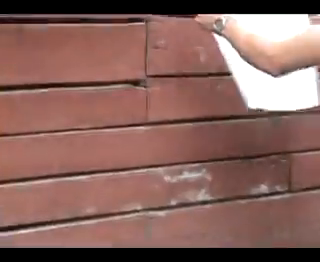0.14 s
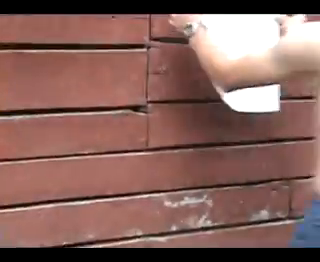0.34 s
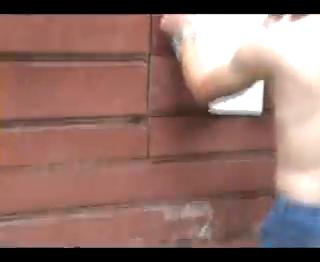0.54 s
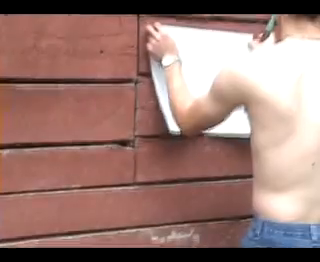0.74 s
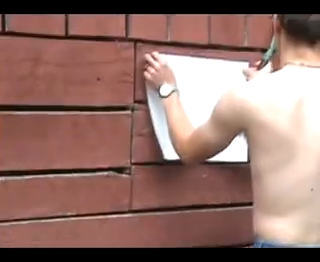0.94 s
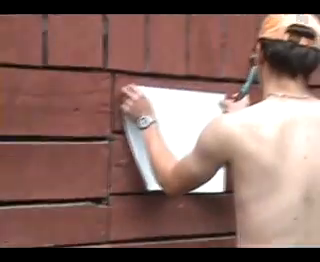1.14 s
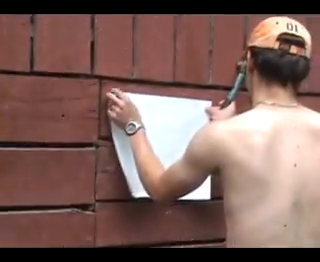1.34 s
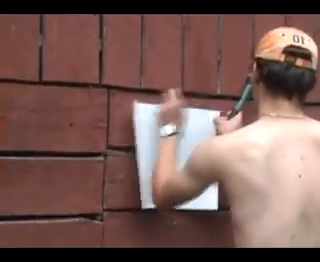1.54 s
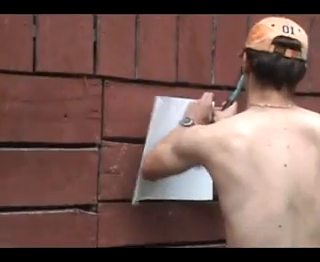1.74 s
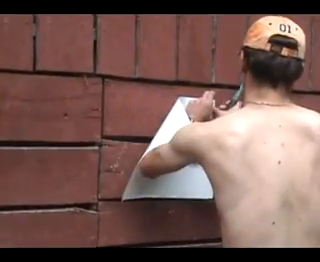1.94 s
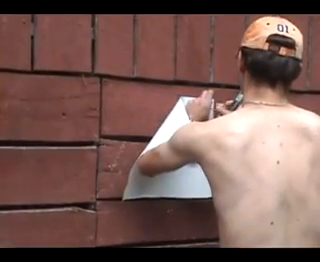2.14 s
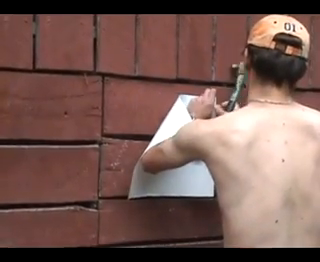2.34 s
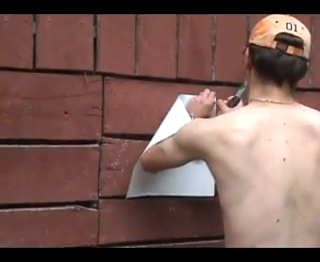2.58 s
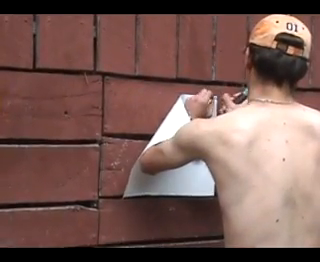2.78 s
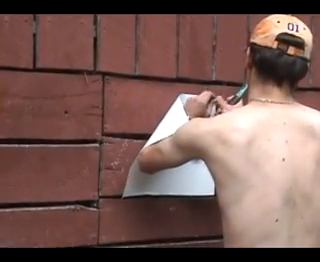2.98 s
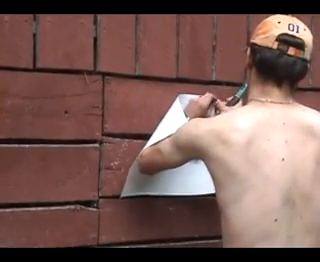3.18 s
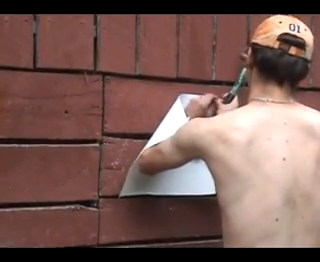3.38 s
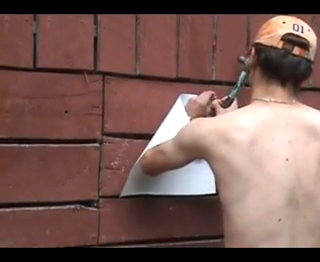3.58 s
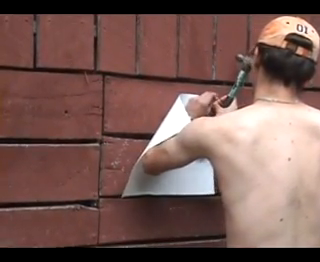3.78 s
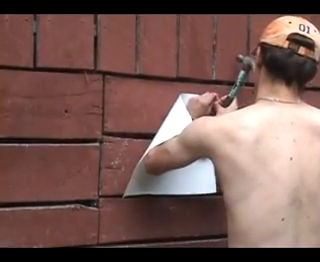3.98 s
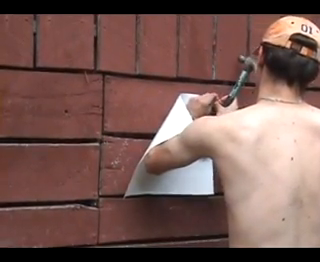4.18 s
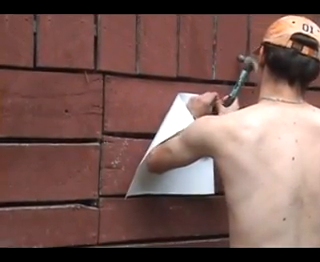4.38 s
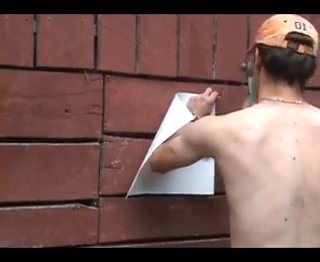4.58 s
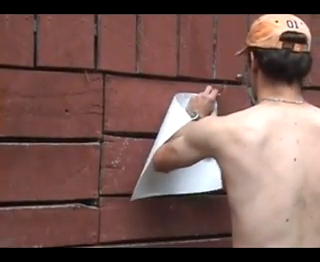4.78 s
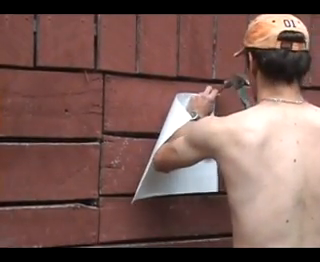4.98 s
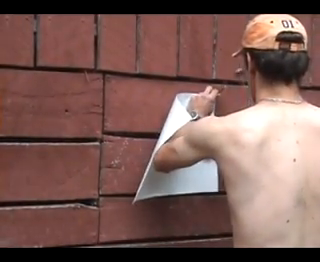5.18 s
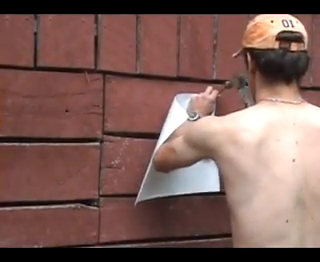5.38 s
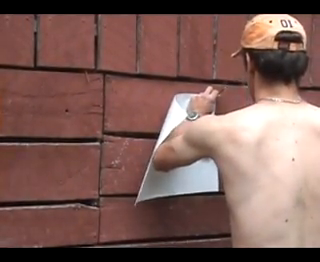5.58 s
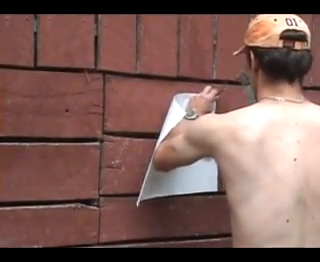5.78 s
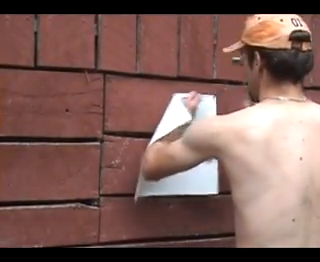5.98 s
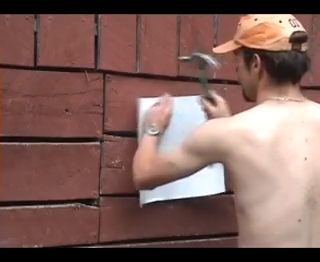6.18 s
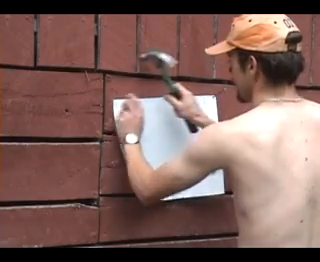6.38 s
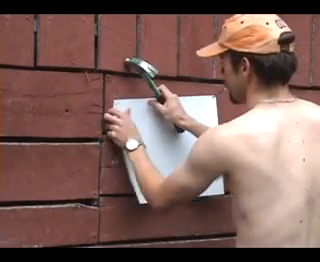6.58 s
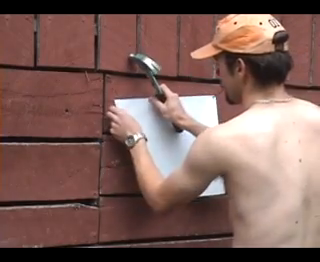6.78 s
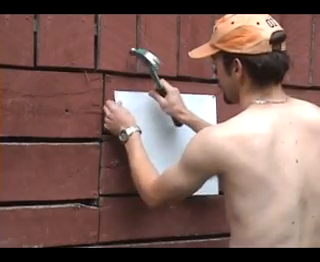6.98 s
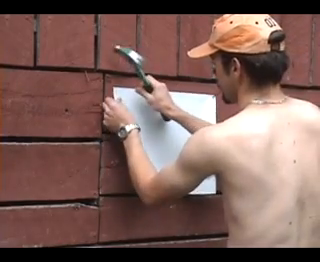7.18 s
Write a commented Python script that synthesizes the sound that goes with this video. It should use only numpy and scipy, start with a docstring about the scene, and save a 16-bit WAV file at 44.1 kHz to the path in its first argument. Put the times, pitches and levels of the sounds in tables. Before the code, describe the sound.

Close handling clicks and rubbing give way to quiet paper scrapes, soft wooden thuds, then sharp hammer blows on hollow boards over faint hiss.

```python
"""At a plank barn wall, a sheet of paper is nailed up near a hand-held tape camera.
First fingers creak, rub and bump on the camera shell: decaying modes and shaped friction noise.
Then hands and hammer thud on the hollow wall (plank modes over dense ringing), and the paper slides
and ticks as noise in strokes and bursts. The camera motor whines as wavering sines under hiss,
and a limiter holds down the loud peaks."""
import sys
import numpy as np
from scipy import signal
from scipy.fft import rfft, irfft, next_fast_len
from scipy.io import wavfile
from scipy.ndimage import uniform_filter1d, minimum_filter1d, map_coordinates

SR = 44100
rng = np.random.default_rng(int(sys.argv[2]) if len(sys.argv) > 2 else 0)


def to_wav(s):
    """Save 16-bit WAV."""
    ch = np.atleast_2d(s).T  # columns
    pcm = np.round(np.clip(ch, -1, 1) * 32767)  # PCM
    wavfile.write(sys.argv[1], SR, pcm.astype(np.int16))


N = 318843

# signs of the left and right channels
SIDES = np.array([[1], [-1]])
# correlation of left and right for hiss and loose rattles: freq_hz, likeness (-1 to 1)
HISS_ALIKE = [(60, 0.45), (130, -0.48), (290, -0.16), (640, 0.3), (1410, 0.19), (3100, 0.66), (6820, 0.41),
              (15000, -0.51)]
# correlation of left and right for friction, ticks and boards: freq_hz, likeness (-1 to 1)
NEAR_ALIKE = [(60, 1), (130, 1.0), (290, 0.99), (640, 0.89), (1410, 0.86), (3100, 0.92), (6820, 1),
              (15000, 0.54)]
# relative spectrum of the bright part of friction: freq_hz, density_db (per Hz)
FIZZ = [(1290, -21), (2200, -7), (2940, -5), (3730, -9), (4360, -7), (8510, -12.5), (11600, -9.5),
        (12600, -35), (13000, -85)]


def amp(db):
    """Decibels are logarithmic: 20 dB is a tenfold gain in amplitude."""
    return 10 ** (np.asarray(db) / 20)


def unit(x):
    """Normalisation by effective value: the signal is scaled to rms 1."""
    return x / np.sqrt(np.mean(x ** 2) + 1e-20)


def along(points, hz):
    """Interpolation of (frequency, value) points along a logarithmic frequency axis."""
    f, v = np.transpose(points)
    return np.interp(np.log(hz + 1), np.log(f + 1), v)


def tilt(hz, db_per_octave, pivot_hz):
    """Spectral slope: a constant number of decibels per octave about a pivot."""
    return amp(db_per_octave * np.log2(np.maximum(hz, 20) / pivot_hz))


def soft(hz, hardness_hz):
    """Contact time: a softer contact lasts longer and drives less treble."""
    return 1 / (1 + (hz / hardness_hz) ** 2)


def wobble(rate):
    """Slow random modulation: a smooth curve through random knots, rate of them a second."""
    knots = rng.standard_normal(int(N * rate / SR) + 4)
    return map_coordinates(knots, [np.arange(N) * rate / SR])


def filtered(x, response):
    """Linear filtering: the spectrum of x is multiplied by a response of frequency."""
    m = next_fast_len(x.shape[-1] + 8192)
    return irfft(rfft(x, m) * response(np.fft.rfftfreq(m, 1 / SR)), m)[..., :x.shape[-1]]


def stereo(pair, spectrum, alike):
    """Interchannel correlation: two unrelated signals, coloured, mix as mid and side to a set likeness."""
    # difference of the two microphones: freq_hz, left_minus_right_db
    lean = [(300, 0), (700, -1), (1290, -2.5), (2380, -3), (4400, -4.5), (8120, -0.5), (15000, -9)]

    def mid_side(hz):
        turn = np.arccos(np.clip(along(alike, hz), -1, 1)) / 2
        return amp(along(spectrum, hz)) * [np.cos(turn), np.sin(turn)]

    mid, side = filtered(pair, mid_side)
    left_right = np.array([mid + side, mid - side])
    return filtered(left_right, lambda hz: amp(SIDES * along(lean, hz) / 2))


def rustle(spectrum, grain_db, surge_db):
    """Friction as modulated noise: fine grains in time, and surges in patches of the spectrum."""
    grains = amp(grain_db * wobble(500)) * rng.standard_normal((2, N))
    z = signal.stft(grains, nperseg=256)[2]
    patches = uniform_filter1d(rng.standard_normal(z.shape[1:]), size=14, axis=0)
    patches = uniform_filter1d(patches, size=5, axis=1)
    pair = signal.istft(z * amp(surge_db * unit(patches)), nperseg=256)[1][:, :N]
    return unit(stereo(pair, spectrum, NEAR_ALIKE))


def strokes(rows, rise_db_per_s, fall_db_per_s, rest_db):
    """Stroke envelopes, summed in power: each rises, holds its length and falls to a faint rest level."""
    start, length, *levels = np.transpose(rows)[:, :, None]
    t = np.arange(0, N / SR + .002, .001)
    before, after = np.maximum(start - t, 0), np.maximum(t - start - length, 0)
    loss = rise_db_per_s * before + fall_db_per_s * after
    gains = []
    for db, rest in zip(levels, rest_db):
        power = np.sum(amp(db - loss) ** 2, axis=0) + amp(rest) ** 2
        gains.append(np.interp(np.arange(N) / SR, t, np.sqrt(power)))
    return gains


def add(track, s, sound):
    """Superposition: a short sound is added to the track at s seconds."""
    part = track[:, round(s * SR):][:, :sound.shape[1]]
    part += sound[:, :part.shape[1]]


def camera():
    """Periodic and random machine noise: motor lines that waver a little in phase and level, over hiss."""
    # motor lines: freq_hz, level_db
    motor_lines = [(91.5, -63.5), (473.7, -66), (802.1, -58.5), (1147, -66.5), (1459, -67.5), (2099, -75),
                   (2611, -74), (2945, -77), (4194, -77)]
    # relative hiss spectrum: freq_hz, density_db (per Hz)
    hiss_spectrum = [(15, -34), (25, -6), (50, -4.5), (110, -2), (200, -1), (340, -3), (600, -1.5),
                     (1100, -9.5), (1700, -12), (2500, -12.5), (3500, -16), (5600, -16), (8000, -27),
                     (11000, -32), (13000, -75)]
    hiss_db = -58.5
    t, whine = np.arange(N) / SR, 0
    for hz, db in motor_lines:
        waver = min(hz / 900, 1) * wobble(14)
        side_phase = SIDES * min(hz / 700, 1.2)
        level = amp(db + 2.4 * wobble(8.6))
        whine = whine + level * np.sin(2 * np.pi * hz * t + waver + side_phase)
    hiss = unit(stereo(rng.standard_normal((2, N)), hiss_spectrum, HISS_ALIKE))
    return whine + amp(hiss_db + 0.2 * wobble(3.7)) * hiss


def grip():
    """Sliding friction and rocking: the palm rubs the shell and rocks the camera until the grip settles."""
    # strokes of the palm: start_s, length_s, rub_db, fizz_db
    palm_strokes = [(0.0, 0.098, -50, -75), (0.03, 0.012, -58, -60), (0.09, 0.014, -43.5, -74),
                    (0.21, 0.023, -50, -70), (0.365, 0.064, -44.5, -59), (0.44, 0.03, -56, -65),
                    (0.53, 0.014, -55, -58), (0.605, 0.075, -53, -53), (0.705, 0.017, -48, -63),
                    (0.803, 0.018, -53, -53.5), (0.93, 0.026, -62, -72), (1.02, 0.032, -53, -57.5),
                    (1.08, 0.028, -56, -56), (1.235, 0.0089, -56, -53), (1.37, 0.065, -58, -56),
                    (1.44, 0.07, -52, -61), (1.55, 0.057, -54, -72), (1.71, 0.061, -55, -62),
                    (1.77, 0.024, -44.5, -57), (1.89, 0.019, -60, -58.5), (1.99, 0.02, -51.5, -58),
                    (2.075, 0.023, -52, -60)]
    # relative spectrum of the rub: freq_hz, density_db (per Hz)
    rub_spectrum = [(88, -12), (150, 12), (945, 19), (1240, 13), (1510, 17.5), (3350, 6), (4000, -1),
                    (5200, -57), (8800, -120)]
    # rocking of the camera: start_s, level_db
    bumps = [(0.22, -45.5), (0.6, -45), (0.82, -43), (1.03, -41), (1.42, -39.5), (1.78, -64)]
    # relative spectrum of the rocking: freq_hz, density_db (per Hz)
    bump_spectrum = [(15, -8), (30, -21), (55, -1), (90, -47), (150, -49)]
    still_s = 2.15
    rub, fizz = strokes(palm_strokes, rise_db_per_s=704, fall_db_per_s=348, rest_db=(-64, -72))
    bump_rows = [(s, 0, db) for s, db in bumps]
    rock, = strokes(bump_rows, rise_db_per_s=450, fall_db_per_s=400, rest_db=[-79])
    rocking = rock * unit(stereo(rng.standard_normal((2, N)), bump_spectrum, [(30, 0.4)]))
    rubbing = rub * rustle(rub_spectrum, grain_db=3.0, surge_db=4.0)
    fizzing = fizz * rustle(FIZZ, grain_db=3.0, surge_db=-1.0)
    moving = np.clip((still_s - np.arange(N) / SR) * 20, 0, 1)  # fades over the last 50 ms
    return moving * (rubbing + fizzing + rocking)


def creaks():
    """Stick-slip and modal ringing: each slip of a finger rings the shell, unequally at two microphones."""
    # slips: start_s, level_db, brightness_db_per_octave, depth_db (modes under 650 Hz), left_minus_right_db
    slips = [(0.104, -12, -6.5, 1, -0.5), (0.158, -17.5, -9, 7.5, 1), (0.194, -32, -20, 15, 5),
             (0.205, -23.5, -18, 10, 2), (0.228, -36.5, -6, 12, 0), (0.352, -33, -9, 25, 2),
             (0.388, -23, -5, -11, -5), (0.396, -13.5, -4.5, -2, 0), (0.444, -29, -0.5, -9, 1.5),
             (0.524, -11, -2.5, -1, 0.5), (0.573, -19.5, -26, -2, 7), (0.585, -22.5, -14, 5, -3),
             (0.649, -29, -5, -4, -3), (0.719, -16, -5.5, 0, -0.5), (0.753, -19.5, -7, 4, 0.5),
             (0.778, -24, -10, -2, 1), (0.792, -24.5, -19, 7, 4), (0.803, -22, -12, 5.5, -2),
             (0.973, -17, -8.5, -1.5, 1.5), (1.024, -25.5, -30, 3, 3.5), (1.068, -34, -14, 13, 1),
             (1.093, -28.5, -35, 4, 6), (1.131, -27, -31, 12, 0), (1.201, -22.5, -8.5, 4, 2.5),
             (1.303, -23.5, -7, -1.5, 1), (1.372, -23.5, -11, 3, 2), (1.402, -41, -10, 9, 8),
             (1.418, -13.5, 2, 10.5, 0.5), (1.461, -39, -5, 11, -4), (1.489, -38, 4, 13, 2),
             (1.57, -22.5, -5, 3, -3.5), (1.584, -26, -4.5, 6, 7), (1.602, -28, -4.5, 6, -10),
             (1.624, -33.5, 1, 11, 0), (1.645, -37, -21, 7, -1), (1.689, -41, -13, 20, 2),
             (1.723, -28.5, -4, 2, -6.5), (1.735, -33, 3, -6, 2), (1.746, -38, 3, -8, 2),
             (1.759, -22.5, 2.5, -3, 2.5), (1.915, -38, 0.5, 6, 4), (1.989, -38.5, 7, 6, -3),
             (2.081, -45.5, -2, 7, -7)]
    # shell modes: freq_hz, level_db, t60_s, left_minus_right_db, left_lead_rad (used within 3 either way)
    shell = [(357, -13.5, 0.038, 9, 1), (544, -2, 0.022, -5, 1.27), (785, 2, 0.034, -1, 1.67),
             (1070, -2, 0.05, -12, -3), (1340, -31.5, 0.06, -43, -5), (1694, -1, 0.025, -6, 0.7),
             (2150, -12, 0.028, -1, 0.5), (2695, -4, 0.028, -4, 0.46), (3194, -10, 0.025, 9, 0),
             (3930, -7.5, 0.025, -13.5, -13.5), (4485, -16.5, 0.033, 1, 0.3), (5300, -12.5, 0.024, -5, -8),
             (7430, -32, 0.013, -5, -0.8)]
    # relative spectrum of loose parts: freq_hz, density_db (per Hz)
    rattle_spectrum = [(150, -13.5), (400, 9.5), (900, 4), (1400, -6.5), (2500, -18), (4000, -24),
                       (8000, -66)]
    out, t = np.zeros((2, N)), np.arange(SR // 8) / SR
    hz, level, t60, lean, lead = np.transpose(shell)[:, :, None, None]
    dying = amp(-60 * t / t60) + amp(6.5 - 60 * t / (0.41 * t60))  # the first swings are the largest
    for s, db, bright_db, depth_db, pan_db in slips:
        share = amp(level + depth_db * (hz < 650) + rng.normal(0, 2, hz.shape))
        share = share * tilt(np.maximum(hz, 1200), bright_db, 1200)
        pitch = hz * (1 + rng.normal(0, 0.026, hz.shape))
        turn = 2 * np.pi * pitch * t + np.clip(lead, -3, 3) * (SIDES > 0)
        ring = np.sum(share * dying * amp(SIDES * lean / 2) * np.sin(turn), axis=0) / share.sum()
        ring = ring * (1 - np.exp(-t / .0004)) ** 2
        # loose parts rattle on, duller and later
        shaking = (1 - np.exp(-t / 0.00061)) ** 2 * amp(-60 * t / 0.092)
        rattle = stereo(rng.standard_normal((2, len(t))) * shaking, rattle_spectrum, HISS_ALIKE)
        # hard slips spit treble
        snap_gain = (1 - np.exp(-t / 0.0013)) * amp(-17.5 + 2.5 * bright_db - 60 * t / 0.018)
        snap = snap_gain * rng.standard_normal(len(t))
        click = ring + amp(-7) * rattle + snap
        add(out, s + 0.0015, amp(db + 5.5 + SIDES * pan_db / 2) * click)
    return out


def paper():
    """Friction and impulses: the sheet slides on rough paint; single creases and the nail tick."""
    # strokes of the sheet over the paint: start_s, length_s, slide_db, fizz_db
    swipes = [(2.24, 0.053, -62, -76), (2.61, 0.064, -64, -62.5), (2.7, 0.023, -56, -70),
              (2.935, 0.012, -59, -66), (3.0, 0.035, -52.5, -61), (3.1, 0.026, -59, -62),
              (3.175, 0.11, -55, -70), (3.32, 0.072, -61.5, -62), (3.47, 0.055, -56.5, -59.5),
              (3.62, 0.027, -54.5, -64), (3.74, 0.026, -60, -66), (4.21, 0.02, -75, -78),
              (4.43, 0.014, -60, -57.5), (4.498, 0.0064, -51, -74), (4.755, 0.029, -43, -47),
              (4.8, 0.022, -53.5, -58), (4.92, 0.0092, -56.5, -60), (5.19, 0.02, -61, -82),
              (5.5, 0.15, -50, -64.5), (5.86, 0.061, -39, -44.5), (5.97, 0.12, -45.5, -53.5),
              (6.12, 0.12, -48, -46), (6.26, 0.086, -51.5, -50), (6.38, 0.16, -58.5, -56),
              (6.63, 0.014, -54, -60), (6.76, 0.036, -49.5, -47.5), (6.875, 0.022, -55.5, -55.5),
              (7.04, 0.17, -62.5, -59.5)]
    # relative spectrum of the slide: freq_hz, density_db (per Hz)
    slide_spectrum = [(120, -80), (200, -39), (310, -0.5), (419, -15.5), (946, -8), (1030, -10.5),
                      (4000, -25), (5200, -69), (8800, -120)]
    # ticks of paper and nail: start_s, level_db, brightness_db_per_octave
    ticks = [(2.399, -42.5, -2.5), (2.698, -45, -2), (3.089, -24.5, -4.5), (3.19, -40, -11),
             (3.21, -37.5, -2), (3.262, -40, -12), (3.328, -46, 2.5), (3.519, -43.5, -5), (3.622, -38, 1),
             (3.632, -34.5, -2.5), (3.745, -38, -2.5), (3.768, -46, -7), (4.158, -53.5, 6),
             (4.198, -45.5, 0), (4.294, -47, -14), (4.434, -49, 1), (4.494, -39.5, -9), (4.707, -40, -10.5),
             (4.764, -26, -4), (4.829, -40.5, -0.5), (4.918, -48, -6), (5.864, -45, -5), (6.208, -33.5, -6),
             (6.758, -39.5, 2), (6.874, -44, 2), (7.031, -45, -5)]
    # tick spectrum before its brightness slope: freq_hz, density_db (per Hz)
    tick_spectrum = [(200, -29.5), (500, -4), (1000, 4.5), (2500, 6.5), (6000, -9), (12000, -23)]
    tick_t60_s = 0.049
    slide, fizz = strokes(swipes, rise_db_per_s=706, fall_db_per_s=309, rest_db=(-66.5, -70.5))
    out = slide * rustle(slide_spectrum, grain_db=1.0, surge_db=1.5)
    out = out + fizz * rustle(FIZZ, grain_db=1.0, surge_db=3.0)
    t = np.arange(SR // 8) / SR
    tick_shape = (1 - np.exp(-t / 0.00086)) * amp(-60 * t / tick_t60_s)
    for s, db, bright_db in ticks:
        burst = rng.standard_normal((2, len(t))) * tick_shape
        colour = [(hz, level + bright_db * np.log2(hz / 1500)) for hz, level in tick_spectrum]
        add(out, s, amp(db) * stereo(burst, colour, NEAR_ALIKE))
    return out


def hammer_snap(t):
    """Hard impact: steel on steel gives a sharp snap, the ring of the head and a short bright spray."""
    head_hz, head_db, head_t60_s = 2830, -14.5, 0.047
    snap = np.sin(2 * np.pi * 4000 * t) * amp(-60 * t / 0.002)
    ring = np.sin(2 * np.pi * head_hz * t) * amp(head_db - 60 * t / head_t60_s)
    spray = 0.2 * rng.standard_normal(len(t)) * amp(-60 * t / 0.065)
    return snap + ring + spray


def wall():
    """Modal and statistical response: blows excite plank modes and dense ringing of boards and hollow."""
    # blows: start_s, level_db, hardness_hz, boom_db, plank_hz, lift_db (near plank_hz), crack_db, rise_s
    blows = [(1.072, -45, 300, -7, 290, 9.5, -70, 0.0049), (2.414, -32, 350, -11, 258, 6, -70, 0.0012),
             (3.061, -38, 710, 0, 162, 4.5, -70, 0.0039), (3.729, -69, 547, -20, 315, 8.5, -70, 0.0035),
             (5.045, -46.5, 503, 5, 244, 12, -26, 0.00038), (5.385, -22.5, 1450, 3.5, 470, 4, -6, 0.00075),
             (5.7213, -17, 1890, -3.5, 305, 2.5, -4, 0.0018), (6.64, -38, 613, -3.5, 275, 5, -45, 0.00077)]
    # plank modes: freq_hz, level_db, t60_s
    planks = [(57, -16, 0.93), (102.3, -8, 0.92), (158.4, -7.5, 1), (181.7, -7.5, 1), (231.2, -11.5, 0.57),
              (253.2, -1.5, 0.32), (284.4, -9, 0.49), (306.9, -2.5, 0.27), (396.3, -8.5, 0.36),
              (430.6, -14.5, 0.7), (486.4, -4.5, 0.44), (533, -3.5, 0.24), (598, -12, 0.56),
              (678, -7.5, 0.49), (748, -19.5, 0.76), (831.4, -6.5, 0.37), (960, -31, 0.2)]
    # relative spectrum of the dense ringing: freq_hz, density_db
    boards = [(40, -11.5), (100, -3), (250, -4), (500, 1.5), (1000, -1), (2000, -3), (4000, -9),
              (8000, -16), (14000, -28)]
    # decay of the dense ringing: freq_hz, t60_s
    board_fade = [(50, 3.12), (150, 2.02), (400, 0.51), (1000, 0.39), (2500, 0.28), (6000, 0.34),
                  (12000, 0.6)]
    tilt_db_per_octave = 1.5
    out, t = np.zeros((2, N)), np.arange(SR + SR // 2) / SR
    hz, level, t60 = np.transpose(planks)[:, :, None]
    for s, db, hardness_hz, boom_db, plank_hz, lift_db, crack_db, rise in blows:
        knock_db = -7.5 - 0.42 * db  # light blows stay more in the struck plank

        def drive(f):
            lift = lift_db * np.exp(-(np.log((f + 1) / plank_hz) / 0.32) ** 2)
            boom = boom_db / (1 + (f / 125) ** 4)
            return soft(f, hardness_hz) * tilt(f, tilt_db_per_octave, 410) * amp(lift + boom)

        def dying(f, u, fade):
            # the struck plank hands its energy on quickly, the whole wall keeps it longer
            decay = amp(-60 * u / fade) + amp(knock_db - 60 * u / (0.53 * fade))
            # the bass comes late, out of the hollow behind
            late = 1 - 0.71 * np.exp(-(u * (f / 100 + 0.74) ** 2 / 0.1) ** 2)
            return decay * late

        share = amp(level + rng.normal(0, 2, hz.shape)) * drive(hz)
        swings = np.sin(2 * np.pi * (hz * t + rng.random(hz.shape)))
        modes = np.sum(share * dying(hz, t, t60) * swings, axis=0)
        f, when, z = signal.stft(rng.standard_normal((2, len(t))), SR, nperseg=512)
        f = f[:, None]
        z = z * drive(f) * dying(f, when + 0.00056, along(board_fade, f))
        dense = signal.istft(z, SR, nperseg=512)[1][:, :len(t)]
        swell = 1 - np.exp(-t / max(rise, 1e-4))
        add(out, s, amp(db) * swell * (modes + amp(14) * stereo(dense, boards, NEAR_ALIKE)))
        add(out, s, amp(crack_db - 2.3 * SIDES) * hammer_snap(t))
    return out


def scene():
    """Linear superposition of all sources."""
    return camera() + grip() + creaks() + paper() + wall()


def record(dry):
    """Band limiting and peak limiting: the treble rolls off; gain clamps at once and recovers more slowly."""
    # treble response, taken relative to its first point: freq_hz, level_db
    treble = [(9000, 2.5), (11000, -10), (13000, -28), (16000, -45)]
    top_hz, ceiling = 16300, .5
    heard = filtered(dry, lambda hz: np.minimum(1, amp(along(treble, hz) - treble[0][1])))
    need = np.minimum(1, ceiling / (np.abs(heard).max(axis=0) + 1e-9))
    held = minimum_filter1d(need, size=661, origin=300)  # 15 ms window, mostly past
    clamp = uniform_filter1d(held, size=45)
    release = uniform_filter1d(held, size=601, origin=290)
    return filtered(heard * np.minimum(clamp, release), lambda hz: hz < top_hz)


dry = scene()
out = record(dry)
to_wav(out)
```